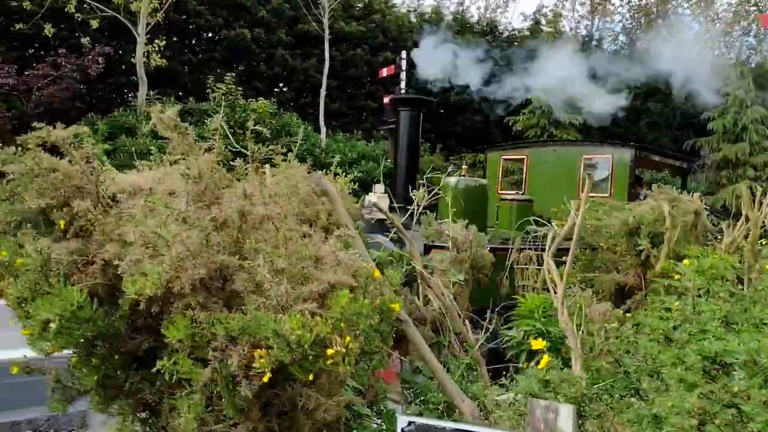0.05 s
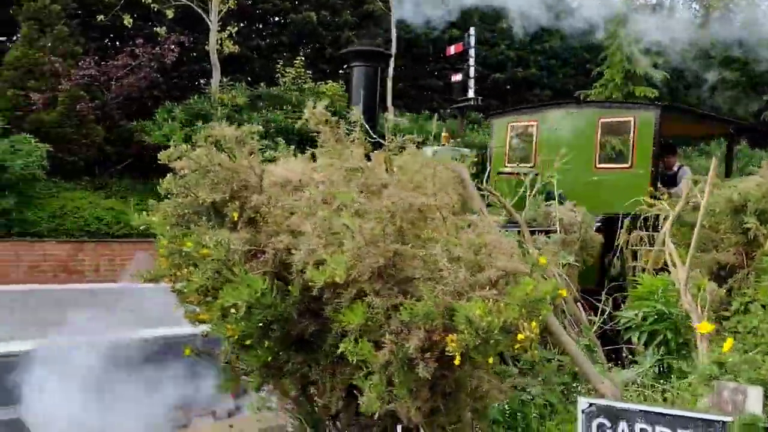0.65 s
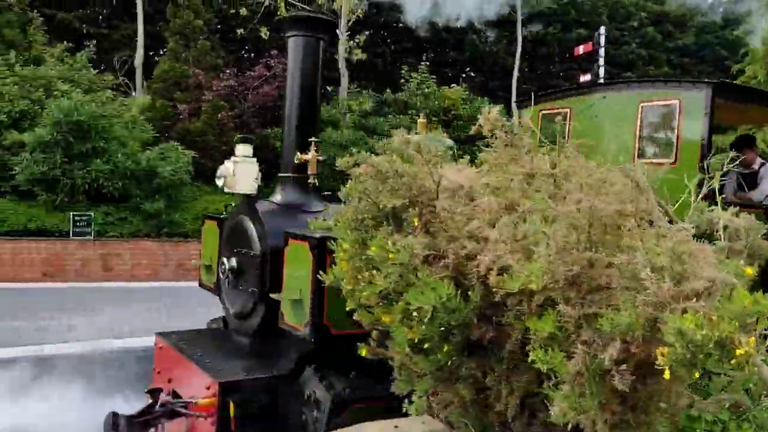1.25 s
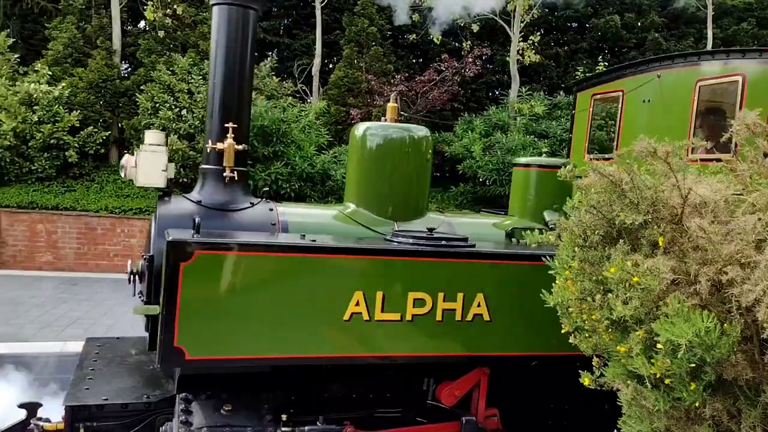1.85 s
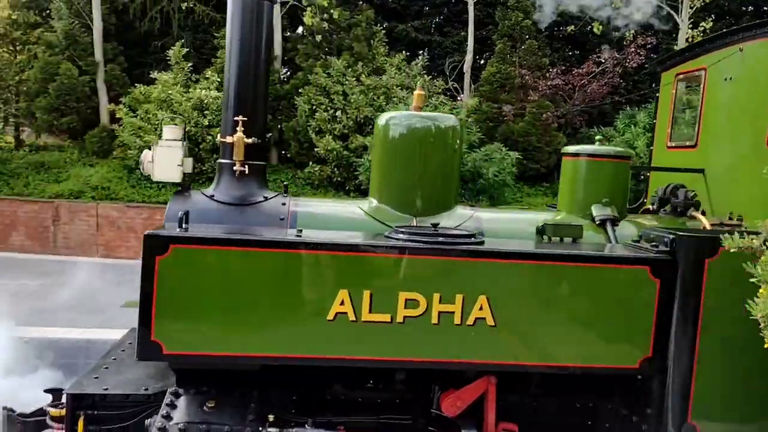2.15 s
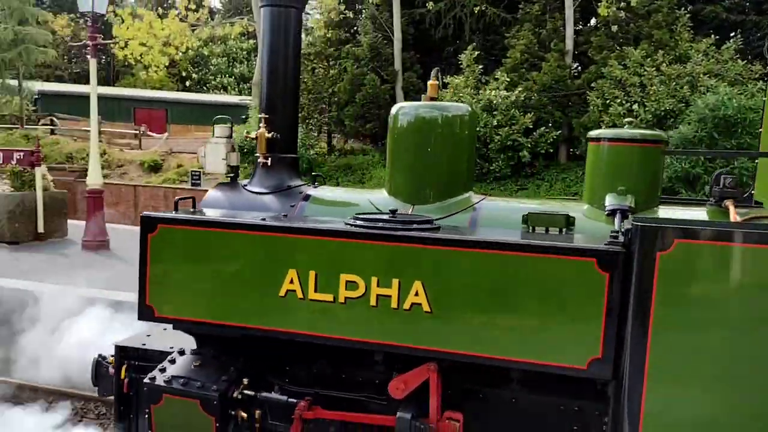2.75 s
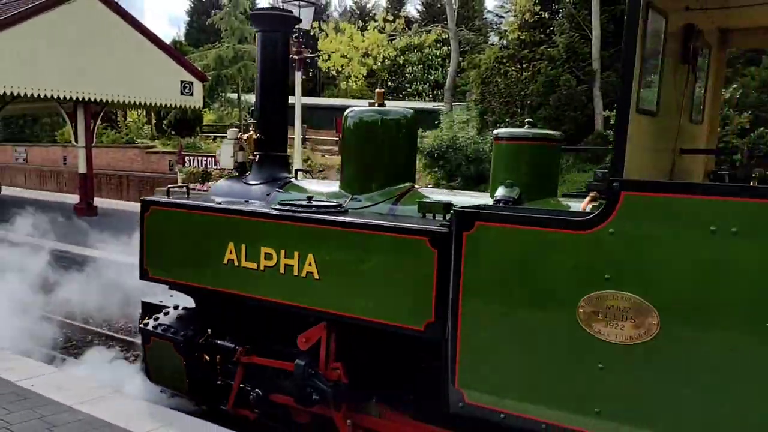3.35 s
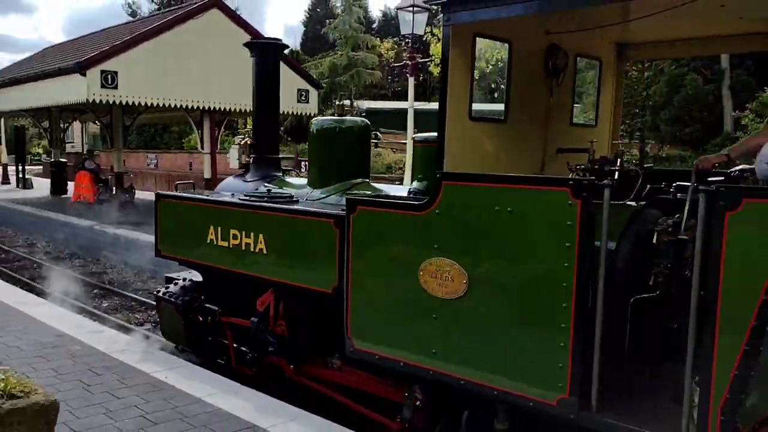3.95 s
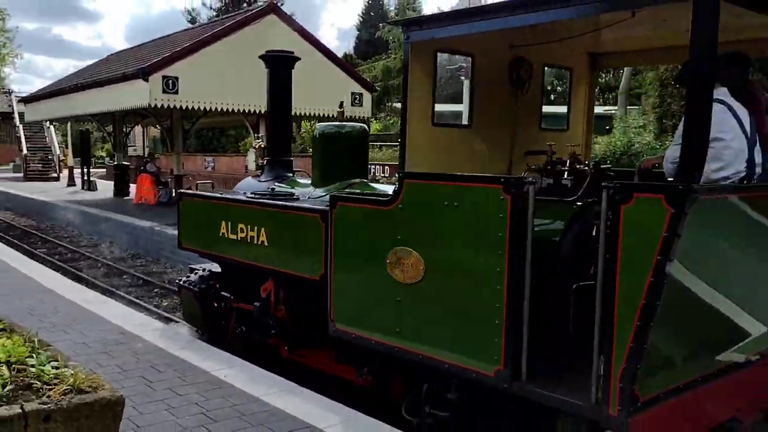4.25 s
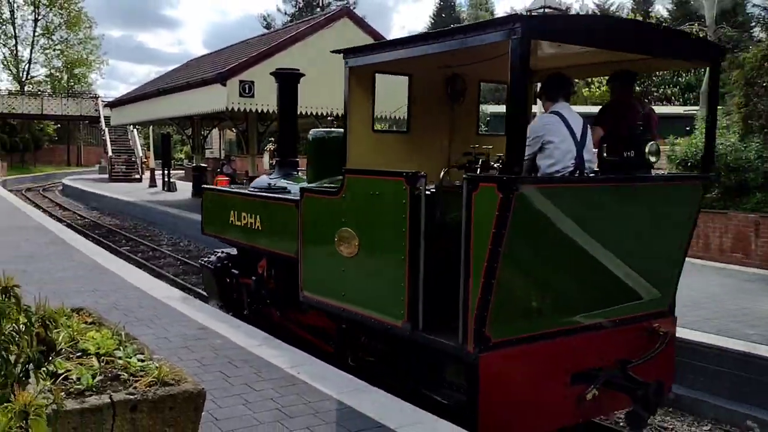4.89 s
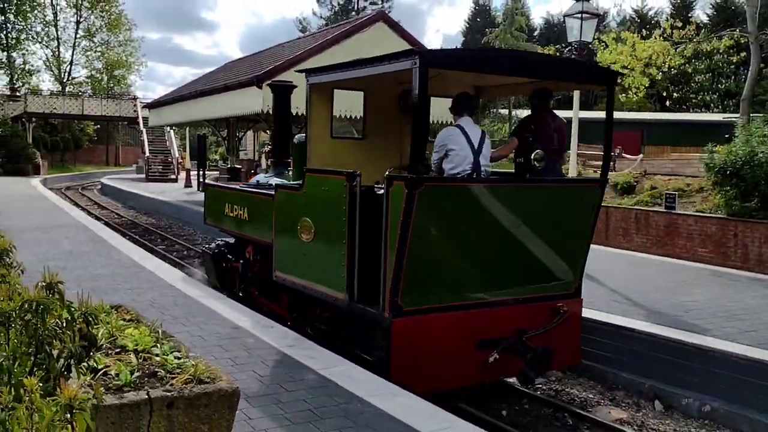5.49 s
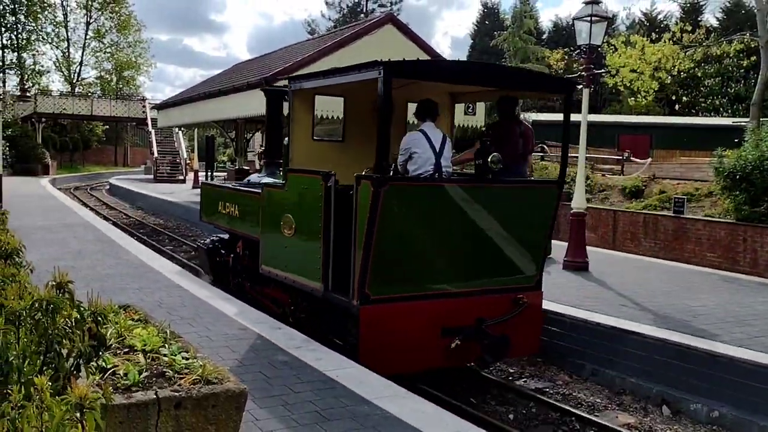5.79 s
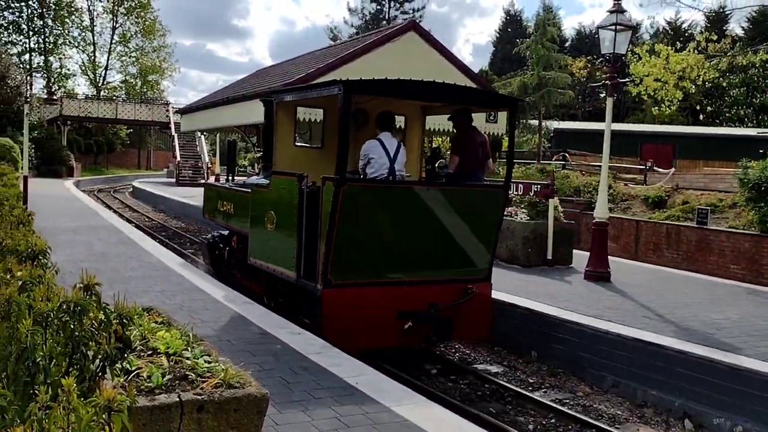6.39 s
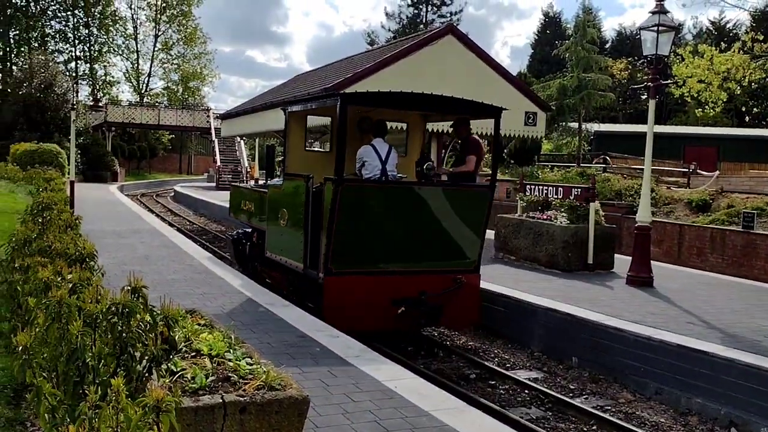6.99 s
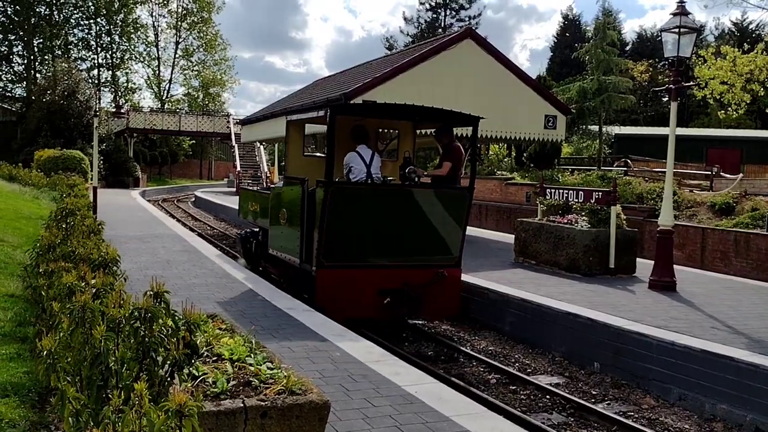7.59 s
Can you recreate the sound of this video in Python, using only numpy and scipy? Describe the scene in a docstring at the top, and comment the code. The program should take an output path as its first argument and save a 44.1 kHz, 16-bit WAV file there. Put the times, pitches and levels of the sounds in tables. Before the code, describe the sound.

A small steam locomotive approaches along an outdoor station platform, its open cylinder valves blasting a loud, sputtering hiss over soft chimney puffs. The hiss falters a few times and shuts off abruptly about halfway through, as the engine passes close to the microphone with a low rumble. It then draws away, slowing, with short rhythmic spits of steam, knocking rods, light clanks and wheel thuds, all growing fainter.

```python
"""A small steam locomotive rolls past

It slows along a platform, steam roaring from its open cylinder drain cocks (small valves). The jets
falter as the piston turns and are shut as the cab goes by. The chimney puffs softly over rumbling
wheels. As the engine draws away, a gland (a rod's seal) spits at every stroke and the rods knock."""
import sys
import numpy as np
from scipy import signal
from scipy.fft import rfft, irfft, next_fast_len
from scipy.io import wavfile
from scipy.ndimage import uniform_filter1d, map_coordinates

SR = 44100
rng = np.random.default_rng(int(sys.argv[2]) if len(sys.argv) > 2 else 0)


def log_audio(samples):
    """Write samples as a 16-bit WAV file to the path given in sys.argv[1]."""
    # one column per channel
    frames = np.atleast_2d(samples).T
    # limit to full scale, then quantise
    limited = np.clip(frames, -1, 1)
    pcm = np.round(limited * 32767).astype(np.int16)
    wavfile.write(sys.argv[1], SR, pcm)


N = 336483
TIME = np.arange(N) / SR

# tone of leaking steam, as a thin hiss and as a wet spit: f/Hz, level/dB
THIN_STEAM = [(1500, -40), (4000, -21), (5200, 4), (6000, 4.5), (6800, 0), (7500, -20), (8200, -14)]
WET_STEAM = [(400, -8), (900, -3.5), (1400, -4), (2000, 1.5), (2500, 4.5), (3000, 6), (4500, 7), (5400, -3),
             (8000, -57)]
# notes of the loose plates and links: f/Hz, level/dB, t60/s (time to fade by 60 dB if left to ring)
PLATE_NOTES = [(380.3, 4, 0.13), (503, -1, 0.19), (610, 1.5, 0.1), (700.7, 2.5, 0.16), (795.5, 2.5, 0.16),
               (927, -7, 0.19), (1071, -1.5, 0.19), (1274, -5, 0.11), (1845, 1, 0.25), (2070, -13.5, 0.063),
               (2600, -9, .06)]


def drain_jets(sputter_db=0.3, flutter_db=1.0, surge_db=0.9, shut_at_s=3.57, shut_fade_s=0.021):
    """Wet steam jets make a fine hiss and a coarse roar, sputtering together until the cocks close."""
    # coarse head-on at first, finer from the side: t/s, hiss/dB, roar/dB
    levels = [(0, -23.5, -22.5), (.14, -20.5, -18), (.42, -26, -20), (.52, -16, -23), (.75, -22, -20.5),
              (.87, -24, -25.5), (1.2, -23.5, -22), (1.5, -20.5, -26), (2.07, -22.5, -26), (2.3, -18, -28),
              (2.8, -22, -26), (2.96, -18.5, -27), (3.36, -25, -28.5), (3.51, -51, -43)]
    # tone of each noise: f/Hz, level/dB
    hiss_tone = [(500, -40.5), (1500, -15.5), (3000, -32), (3900, -13), (4500, 0), (5200, 0), (6000, -0.5),
                 (6900, 2.5), (7500, 2.5), (8100, -4)]
    roar_tone = [(300, -20.5), (700, -24.5), (1300, -7), (1700, -3), (2100, 1.5), (2550, 0), (2900, 2),
                 (3550, 3.5), (3950, 1.5), (4500, 2.5), (6000, -5.5), (8000, -22.5)]
    # the jet beams low notes ahead and high notes sideways: t/s, strongest f/Hz, lift/dB
    beam = [(0, 3610, 7), (.45, 3760, 5.5), (.95, 3840, 4.5), (1.65, 3790, 4), (2.3, 4390, 1.5),
            (3.1, 4540, 5), (3.4, 4730, 4)]
    # the piston turns and the jets falter: t/s, dip of the hiss/dB
    turns = [(0.635, 1.5), (0.96, -0.5), (1.08, 0.5), (1.69, 1.5), (2.127, 5.5), (2.5, 2), (2.887, 11.5),
             (3.266, 7)]
    hiss_db, roar_db = follow(levels)
    dip_db = sum(depth * np.exp(-((TIME - s) / .034) ** 4) for s, depth in turns)
    hiss = turbulence(hiss_tone, patchy_db=2.0, hump=beam, octaves=0.31, patch_bins=10)
    roar = turbulence(roar_tone, patchy_db=3.0, hump=beam, octaves=0.19, patch_bins=6)
    jet = amp(hiss_db - dip_db) * hiss + amp(roar_db - 1.34 * dip_db) * roar  # the roar dips deeper
    jet *= amp(sputter_db * wander(N, 1500) + flutter_db * wander(N, 50) + surge_db * wander(N, 14))
    return jet * np.exp(-np.maximum(TIME - shut_at_s, 0) / shut_fade_s)


def wheels(rumble_gain_db=-3, rail_gain_db=-2, chatter_db=-5, lumpy_db=2.15, hollow_hz=310):
    """The engine's weight rumbles and thuds on the track; the rolling wheels rush and shake the plates."""
    # drawing near, then away: t/s, rumble/dB, wheel on rail/dB
    levels = [(0, -42, -40.5), (.95, -50, -44.5), (1.35, -43, -39), (1.9, -47.5, -42), (2.7, -43, -39.5),
              (3.1, -38, -38.5), (3.38, -32, -34), (3.8, -33, -45.5), (4.25, -37, -45), (5.1, -39.5, -51.5),
              (5.8, -48, -56.5), (6.55, -57, -67), (7.45, -62.5, -66)]
    # tone of each noise: f/Hz, level/dB
    rumble_tone = [(20, -29.5), (40, -21), (62, -7), (82, 2), (115, 0.5), (165, 0.5), (230, -10.5),
                   (320, -23.5), (500, -30), (1000, -50.5)]
    rail_tone = [(100, -14), (280, 9), (400, -3.5), (540, -0.5), (760, 0), (1100, -7), (1500, -9.5),
                 (2000, -11.5), (3500, -18), (5000, -23.5), (8000, -39.5)]
    # the rush sinks in pitch as the wheels go by: t/s, f/Hz, lift/dB
    passing = [(0, 1300, -6.5), (2.8, 1304, 5), (3.8, 976, 13.5), (4.3, 767, -3.5), (6.0, 723, 1.5),
               (7.5, 589, 5)]
    # the hollow under the frames, heard only from the side: t/s, level against the rumble/dB
    hollow = [(3.9, -2.5), (4.5, -12.5), (5.2, -32)]
    # thuds over uneven track: t/s, lift of the rumble/dB
    thuds = [(1.55, 3), (1.76, 4.5), (2.51, 3.5), (3.28, 4), (4.07, 4.5), (4.58, 6), (5.11, 7), (5.43, 5),
             (5.57, 1.5), (5.94, 9.5), (6.14, 4), (6.35, 12.5), (6.641, 12), (6.8, 2.5), (6.93, 7.5),
             (7.12, 17.5), (7.62, 18)]
    rumble_db, rail_db = follow(levels)
    thud_db = sum(lift * np.exp(-((TIME - s) / 0.06) ** 2) for s, lift in thuds)
    rumble = noise(N, rumble_tone)
    rumble += amp(follow(hollow)[0]) * pitched_noise(np.full(N, hollow_hz), width_hz=240)
    rumble *= amp(rumble_db + rumble_gain_db + thud_db)
    rush = amp(rail_gain_db) * turbulence(rail_tone, 3.5, hump=passing, octaves=0.52, patch_bins=3)
    rush += amp(chatter_db) * chatter()
    rush *= amp(rail_db + 0.42 * thud_db)
    return (rumble + rush) * amp(lumpy_db * wander(N, per_s=55))


def exhaust(rise_s=0.0038, fall_s=0.063):
    """Each beat is a soft, dull puff up the chimney."""
    # beats: t/s, level/dB
    beats = [(.1, -45.5), (0.371, -40.5), (.57, -36), (0.731, -45), (1.03, -47.5), (1.329, -34),
             (1.74, -34.5), (2.07, -28.5), (2.47, -31), (2.829, -25.5), (3.268, -27), (4.038, -44)]
    # tone of a puff: f/Hz, level/dB
    tone = [(40, -31.5), (85, -4), (160, -2.5), (320, -4), (520, -11), (760, -17.5), (1300, -10),
            (1900, -19.5), (5000, -41.5)]
    blast = sum(amp(db) * swell(TIME - s, rise_s, fall_s, roundness=0) for s, db in beats)
    return blast * noise(N, tone)


def gland(gain_db=-0.5, sputter_db=2, slack_hz=5900, tight_hz=7300):
    """A thin hiss swells and rises in pitch with each stroke's pressure, ending in a short wet spit."""
    out, t = np.zeros(N), np.arange(-SR // 2, SR // 2) / SR
    for s, hiss_db, spit_db, rise, fall in strokes():
        thin, wet = noise(len(t), THIN_STEAM), noise(len(t), WET_STEAM)
        pressure = swell(t, rise, fall)
        whistle = pitched_noise(slack_hz + (tight_hz - slack_hz) * np.sqrt(pressure), width_hz=1400)
        hiss = amp(hiss_db) * pressure * (thin * np.sqrt(pressure) + whistle) / np.sqrt(2)
        spit = amp(spit_db) * swell(t, 0.6 * rise, 1.08 * fall) * wet
        puff = (hiss + spit) * amp(gain_db + sputter_db * wander(len(t), per_s=490))
        add(out, s + t[0], near_echoes(puff, strength=0.39, spread_s=.004))
    return out


def strokes(return_share=.56, return_stretch=1.14):
    """Lists the piston's forward strokes and the weaker, longer returns between them."""
    # steam past the gland on each forward stroke: peak t/s, hiss/dB, spit/dB
    peaks = [(3.595, -35.5, -39.5), (4, -35.5, -29), (4.401, -43.5, -37.5), (4.865, -48, -42),
             (5.321, -45, -41.5), (5.829, -47, -45), (6.378, -49, -46), (6.983, -52, -47),
             (7.62, -57, -55.5)]
    # strokes lengthen as the engine slows: t/s, rise/s, fall/s
    shapes = [(3.6, 0.015, 0.012), (4.2, 0.021, 0.018), (4.6, 0.042, 0.027), (7.0, 0.074, 0.021)]
    forward = [(s, hiss, spit, 1) for s, hiss, spit in peaks]
    back = [(s + return_share * (after[0] - s), hiss - 16, spit - 11, return_stretch)
            for (s, hiss, spit), after in zip(peaks, peaks[1:])]
    when, rise, fall = np.transpose(shapes)
    return [(s, hiss, spit, stretch * np.interp(s, when, rise), stretch * np.interp(s, when, fall))
            for s, hiss, spit, stretch in forward + back]


def rods(knock_db=-8, ring_db=-9, clack_s=0.024, rattle_db=2.5, vary_db=2.0, cushion_s=0.0032):
    """Slack rods knock on their pins: a clack and a short rattle over a clear ring, never twice alike."""
    # knocks: t/s, level/dB
    knocks = [(3.907, -36), (4.4703, -31.5), (4.63, -48), (4.763, -44), (4.9533, -40.5), (4.988, -39),
              (5.2462, -36.5), (5.3844, -34.5), (5.8462, -38), (5.8922, -38.5), (6.109, -27.5),
              (6.152, -34), (6.2706, -40.5), (6.4344, -41), (6.6717, -52.5), (6.7435, -39), (6.96, -43.5),
              (7.2378, -44.5)]
    # broad pitches of the rattle: f/Hz, width/Hz, level/dB
    rattle_bands = [(904, 470, -8.5), (1360, 270, -34), (2070, 650, -4), (2880, 510, 1.5), (3320, 250, 2.5),
                    (3950, 610, -2), (5170, 670, -18), (7400, 990, -23)]
    # the rod's clear notes: f/Hz, level/dB, t60/s
    notes = [(937, -5.5, 0.26), (1362, -19.5, .31), (1880, -9, 0.31), (2090, -7.5, .31), (2830, -4, 0.25),
             (3320, 1.5, 0.21), (3370, -3.5, 0.3)]
    out, t = np.zeros(N), np.arange(16384) / SR
    hz = np.fft.rfftfreq(len(t), 1 / SR)
    bands = np.array([amp(db) / (1 + (2 * (hz - f) / width) ** 2) for f, width, db in rattle_bands])
    onset = 1 - np.exp(-(t / cushion_s) ** 2)  # the oil film cushions the blow
    shape = onset * (fade(t, t60=0.2) + amp(-1) * np.exp(-t / clack_s))
    for s, db in knocks:
        body = amp(vary_db * rng.standard_normal(len(bands))) @ bands
        rattle = unit(irfft(rfft(rng.standard_normal(len(t))) * body))
        rattle *= amp(knock_db + rattle_db * wander(len(t), per_s=127)) * shape / shape.max()
        ring = amp(ring_db) * onset * ringing(notes, t, vary_db)
        add(out, s - .001, near_echoes(amp(db) * (rattle + ring), strength=0.13, spread_s=0.0065))
    return out


def frames(half_cycles=2.9):
    """Each jolt from the track swells into a hum of one frame or tank, a few cycles long."""
    # hums: t/s, level/dB, f/Hz
    hums = [(2.905, -25.5, 79.2), (3.295, -24, 79.3), (3.53, -26, 77.7), (4.062, -35, 290),
            (4.472, -28, 172.5), (4.599, -24, 170.4), (4.712, -29.5, 129), (5.96, -44, 88)]
    return sum(amp(db) * np.exp(-((TIME - s) * hz / half_cycles) ** 2) * sine(hz, TIME)
               for s, db, hz in hums)


def valve_gear(gain_db=-4, rise_s=0.00083, snap_s=0.007, tail_db=-9, tail_s=0.036):
    """The links that work the steam valves click lightly, each with a brief tail."""
    # clicks: t/s, level/dB
    clicks = [(4.4747, -39), (4.5785, -44.5), (4.9132, -47), (5.501, -47.5), (5.8897, -37), (6.849, -49),
              (7.059, -46.5), (7.1112, -48)]
    # tone of a click: f/Hz, level/dB
    tone = [(800, -17), (2000, -9), (3200, 10), (4300, 7.5), (5200, -7), (6300, 1), (8000, -27.5)]
    out, t = np.zeros(N), np.arange(4096) / SR
    shape = np.minimum(t / rise_s, 1) * (np.exp(-t / snap_s) + amp(tail_db) * np.exp(-t / tail_s))
    for s, db in clicks:
        click = amp(db + gain_db) * shape * noise(len(t), tone)
        add(out, s, near_echoes(click, strength=0.3, spread_s=0.0058))
    return out


def clanks(rise_s=.004, damp_s=.04):
    """A hard jolt shakes all the loose plates at once; their bolts soon quiet them."""
    # jolts: t/s, level/dB
    jolts = [(3.268, -29), (4.597, -46), (4.775, -40), (5.075, -44), (6.125, -50.5), (6.95, -58),
             (7.07, -47), (7.125, -52), (7.538, -48.5)]
    out, t = np.zeros(N), np.arange(SR // 4) / SR
    shape = (1 - np.exp(-t / rise_s)) * np.exp(-t / damp_s)
    for s, db in jolts:
        add(out, s, amp(db) * shape * ringing(PLATE_NOTES, t))
    return out


def chatter(per_s=9, uneven_db=8, detune=0.0692, rise_s=0.005):
    """Random small jolts ring the loose plates, each time a part of slightly different size."""
    out, t = np.zeros(N), np.arange(SR // 4) / SR
    for hz, db, t60 in PLATE_NOTES:
        shape = (1 - np.exp(-t / rise_s)) * fade(t, t60)
        for when, force, size, phase in rng.random((200, 4))[:round(per_s * N / SR)]:
            part_hz = hz * (1 + detune * (2 * size - 1))
            ring = shape * np.sin(2 * np.pi * (part_hz * t + phase))
            add(out, when * N / SR, amp(db + uneven_db * force) * ring)
    return unit(out)


def dribble(thin_db=-52, wet_db=-45, peak_s=3.786, sputter_db=2):
    """The last wet steam seeps out of the closed cocks."""
    steam = amp(thin_db) * noise(N, THIN_STEAM) + amp(wet_db) * noise(N, WET_STEAM)
    shape = swell(TIME - peak_s, rise_s=0.15, fall_s=0.091)
    return steam * shape * amp(sputter_db * wander(N, per_s=54))


def bumps(snap_s=0.00012, fade_s=0.0033):
    """Soft bumps on the microphone: a push snaps over into a pull and makes a dull pop."""
    # pops: t/s, level/dB
    pops = [(1.443, -28.5), (1.503, -22), (1.563, -21)]
    return sum(-amp(db) * np.tanh((TIME - s) / snap_s) * np.exp(-abs(TIME - s) / fade_s)
               for s, db in pops)


def ground(x):
    """An echo off the track's stones cancels some pitches; which ones changes as the engine moves."""
    # the echo: t/s, delay/ms, strength (0-1)
    path = [(0, 1, 0.35), (1.5, 0.94, 0.41), (3.0, 0.99, 0.44), (3.4, 0.78, 0.37), (3.9, 0.93, 0.07),
            (7.63, 0.7, 0.14)]
    # what the stones give back: f/Hz, level/dB
    stones = [(500, 1.5), (2600, -7.5), (3700, -9), (4700, -17), (8000, -21.5)]
    delay_ms, strength = follow(path)
    echo = map_coordinates(colour(x, stones), [np.arange(N) - delay_ms * SR / 1000], order=3)
    return (x + strength * echo) / np.sqrt(1 + strength ** 2 / 2)


def near_echoes(x, strength, spread_s):
    """Echoes off wheels, frame and platform edge give each sound its own hollow tone."""
    out = x.copy()
    for place, sign in rng.random((5, 2)):
        add(out, spread_s * (.15 + place), np.sign(sign - .5) * strength * out)
    return out * np.std(x) / np.std(out)


def station(x, t60=0.25, first_s=0.019):
    """A thin tail of echoes from the platform walls and the canopy."""
    t = np.arange(SR // 2) / SR
    echoes = rng.standard_normal(len(t)) * (rng.random(len(t)) < .05) * (t > first_s) * fade(t, t60)
    tail = signal.fftconvolve(x, echoes / np.linalg.norm(echoes))[:N]
    return colour(tail, [(500, 8), (3000, 1.5), (8000, -26.5)])


def open_air(level_db=-63):
    """The faint, low hush of the outdoors."""
    # its tone: f/Hz, level/dB
    tone = [(20, 0.5), (45, 8), (100, 1.5), (200, -12.5), (350, -17.5), (600, -7.5), (900, -14.5),
            (2000, -9), (3600, -14), (5000, -25), (8000, -32.5)]
    return amp(level_db) * turbulence(tone, patchy_db=2.0)


def turbulence(tone, patchy_db, hump=((0, 1000, 0),), octaves=.25, patch_bins=8):
    """Noise with a moving hump in its tone; swirls lift and drop small patches of pitch and time."""
    hz, t = np.fft.rfftfreq(1024, 1 / SR), np.arange(N // 256 + 5) * 256 / SR
    real, imag, swirls = rng.standard_normal((3, len(t), len(hz)))
    swirls = unit(uniform_filter1d(uniform_filter1d(swirls, 24, axis=0), patch_bins, axis=1))
    centre_hz, lift_db = (column[:, None] for column in follow(hump, t))
    hump_db = lift_db * np.exp(-(np.log2((hz + 1) / centre_hz) / octaves) ** 2)
    spectra = (real + 1j * imag) * amp(level_at(tone, hz) + patchy_db * swirls + hump_db)
    return unit(signal.istft(spectra.T, nperseg=1024, noverlap=768)[1][:N])


def pitched_noise(hz, width_hz):
    """Noise in a band that follows the pitch curve hz."""
    turn, r = np.exp(2j * np.pi * np.cumsum(hz) / SR), np.exp(-np.pi * width_hz / SR)
    band = signal.lfilter([(1 - r) ** 2], [1, -2 * r, r * r], rng.standard_normal(len(hz)) / turn)
    return unit((turn * band).real)


def ringing(notes, t, vary_db=0):
    """The dying notes of a struck part; vary_db changes their shares from blow to blow."""
    ring = sum(amp(db + vary_db * rng.standard_normal()) * fade(t, t60) * sine(hz, t)
               for hz, db, t60 in notes)
    return ring / np.linalg.norm([amp(db) for hz, db, t60 in notes])


def swell(t, rise_s, fall_s, roundness=0.17):
    """Grows to 1 at t = 0 and dies away."""
    return np.exp(roundness - np.hypot(np.maximum(-t / rise_s, t / fall_s), roundness))


def wander(size, per_s):
    """A random curve that takes per_s turns a second."""
    knots = rng.standard_normal(4096)
    return unit(np.interp(np.arange(size) * per_s / SR % 4095, np.arange(4096), knots))


def noise(size, tone):
    """Steady noise with the given tone."""
    return unit(colour(rng.standard_normal(size), tone))


def colour(x, tone):
    """Filters x by a tone table."""
    size = next_fast_len(len(x), True)
    return irfft(rfft(x, size) * amp(level_at(tone, np.fft.rfftfreq(size, 1 / SR))), size)[:len(x)]


def level_at(tone, hz):
    """A tone table's dB at any pitch."""
    f, db = np.transpose(tone)
    return np.interp(np.log(hz + 1), np.log(f + 1), db)


def follow(rows, t=TIME):
    """Each column of a timed table as a curve."""
    s, *columns = np.transpose(rows)
    return [np.interp(t, s, column) for column in columns]


def add(mix, s, sound):
    """Mixes a sound in at s seconds."""
    start = round(s * SR)
    part = mix[max(start, 0):max(start + len(sound), 0)]
    part += sound[max(-start, 0):][:len(part)]


def sine(hz, t):
    return np.sin(2 * np.pi * (hz * t + rng.random()))


def fade(t, t60):
    return np.exp(-np.log(1000) * t / t60)


def amp(db):
    return 10 ** (np.asarray(db) / 20)


def unit(x):
    """Scales x to an average power of 1."""
    return x / np.sqrt(np.mean(x ** 2) + 1e-20)


def scene(echo_db=-17):
    """The engine, its faint echo and the quiet open air, the same in both channels."""
    engine = ground(drain_jets() + wheels() + exhaust())
    engine += dribble() + gland() + rods() + valve_gear() + frames() + clanks()
    mono = engine + open_air() + amp(echo_db) * station(engine) + bumps()
    return np.array([mono, mono])


def record(dry):
    """The microphone's treble rolls off, then stops steeply at 8650 Hz."""
    # its response: f/Hz, level/dB
    microphone = [(20, -4), (7500, 1), (7750, -1.5), (8000, -11), (8300, -15), (8600, -41)]
    heard = np.array([colour(channel, microphone) for channel in dry])
    treble_cut = signal.firwin(511, 8650, window=("kaiser", 9), fs=SR)
    return signal.oaconvolve(heard, treble_cut[None], "same")


dry = scene()
out = record(dry)
log_audio(out)
```